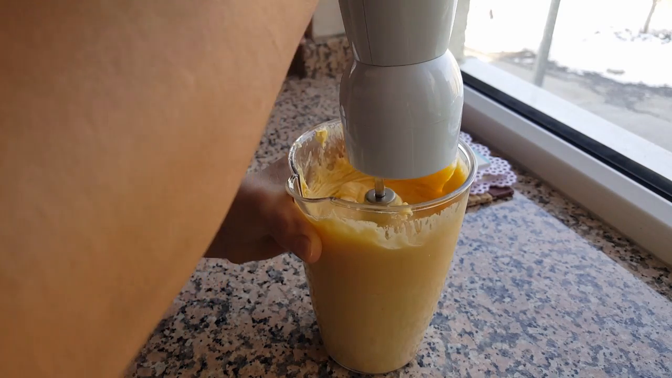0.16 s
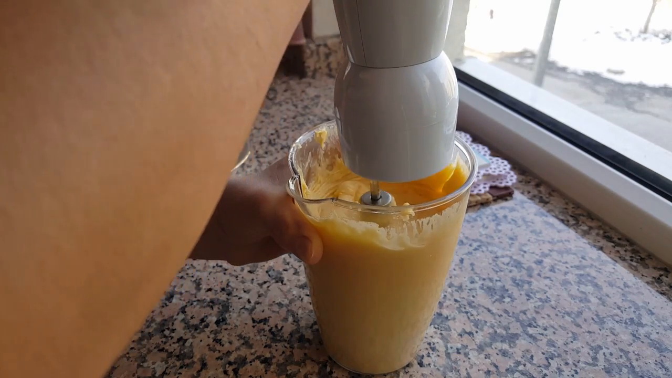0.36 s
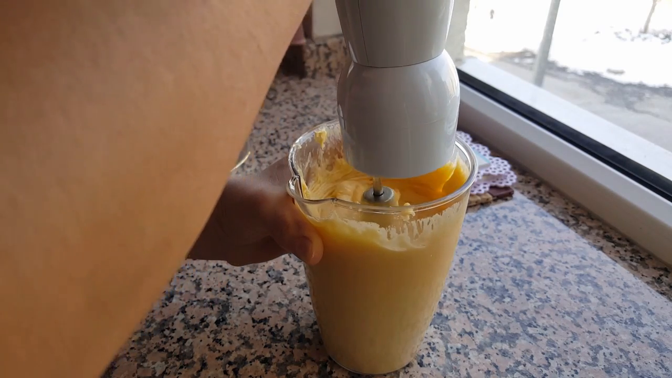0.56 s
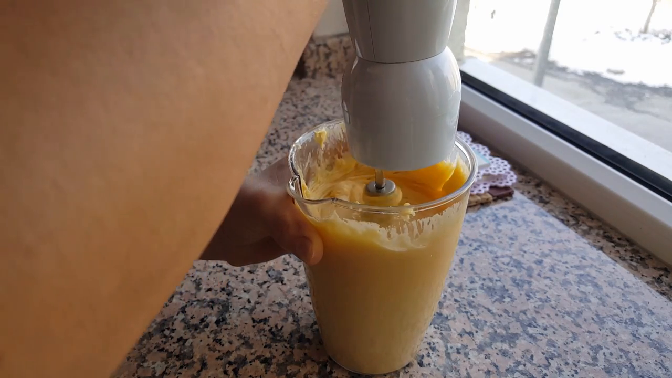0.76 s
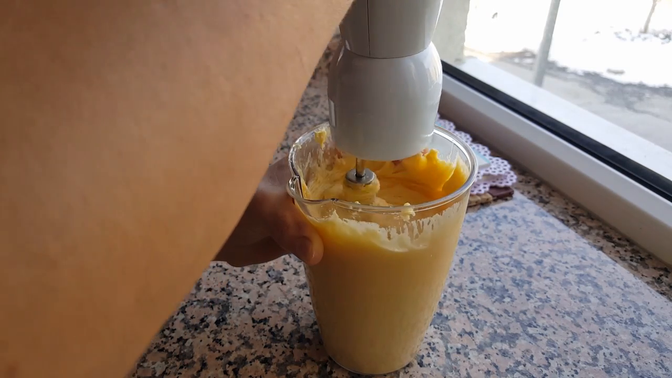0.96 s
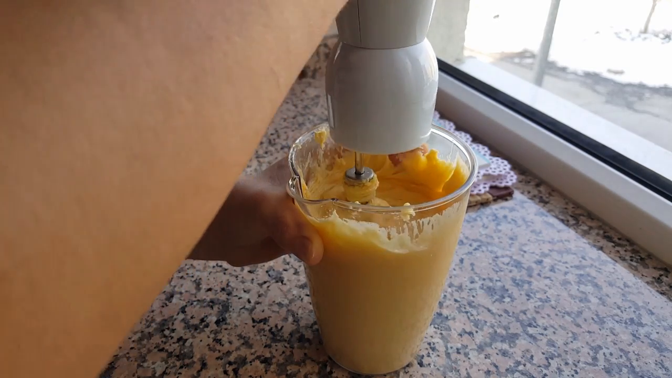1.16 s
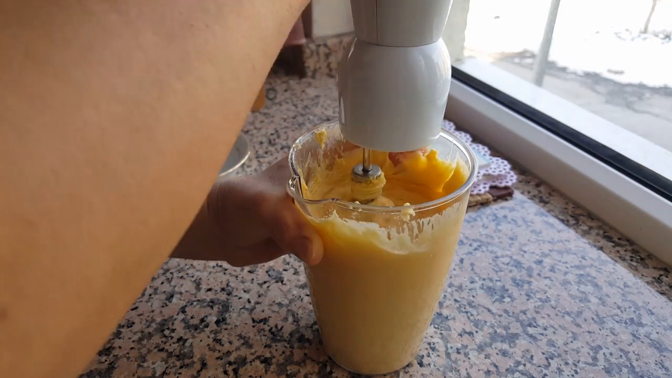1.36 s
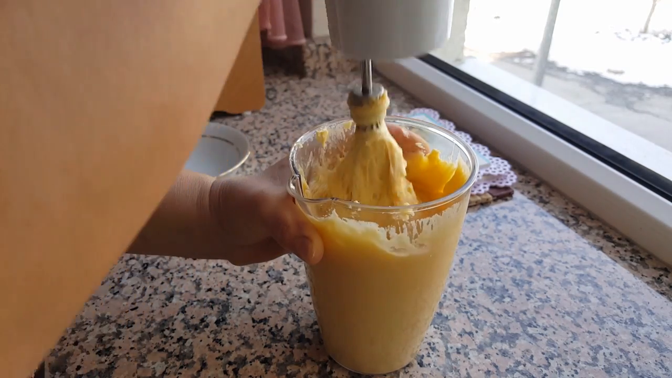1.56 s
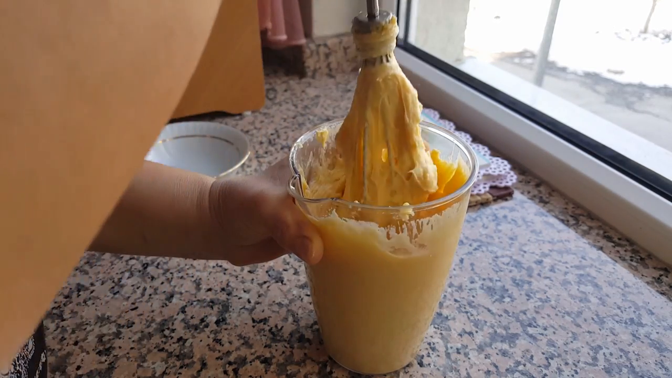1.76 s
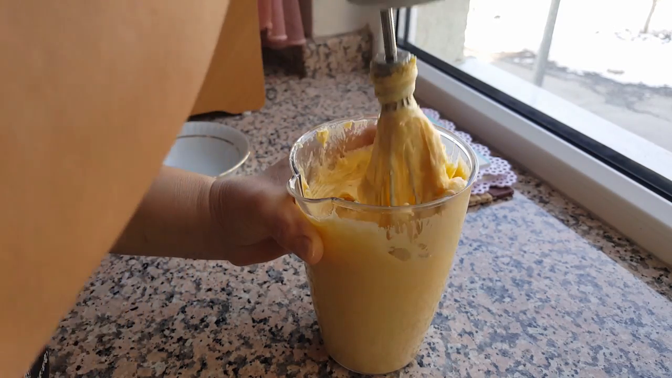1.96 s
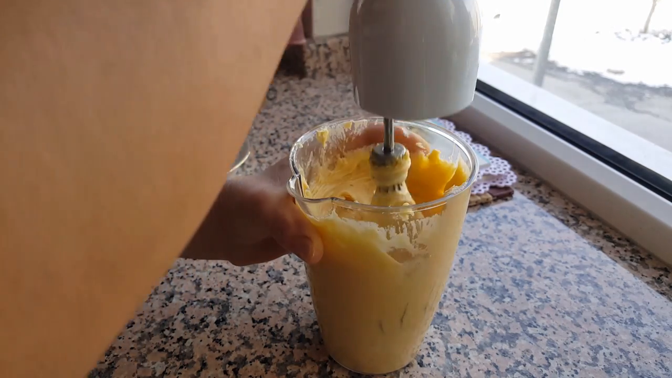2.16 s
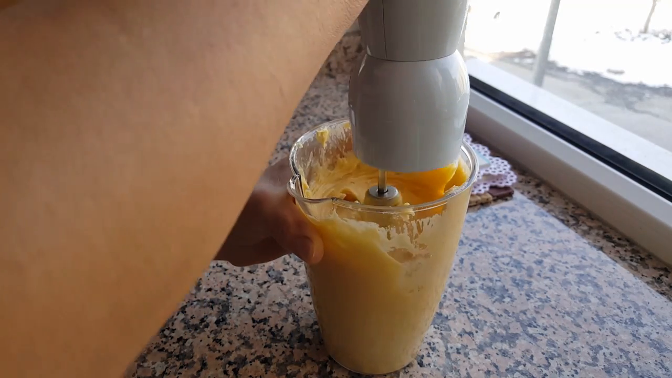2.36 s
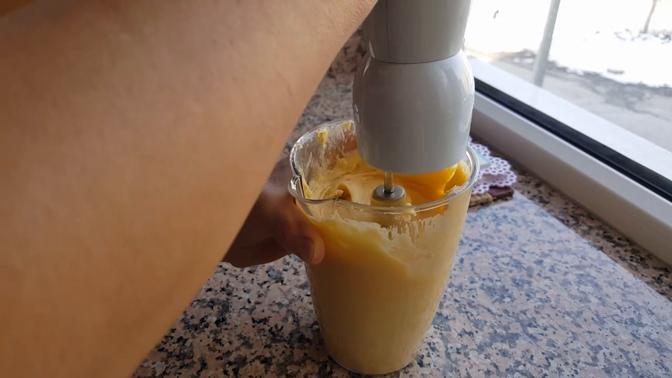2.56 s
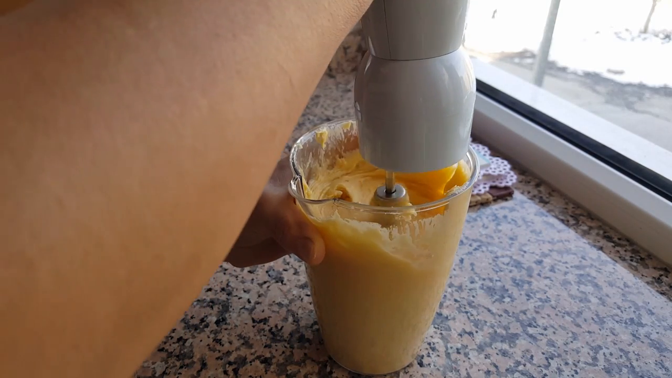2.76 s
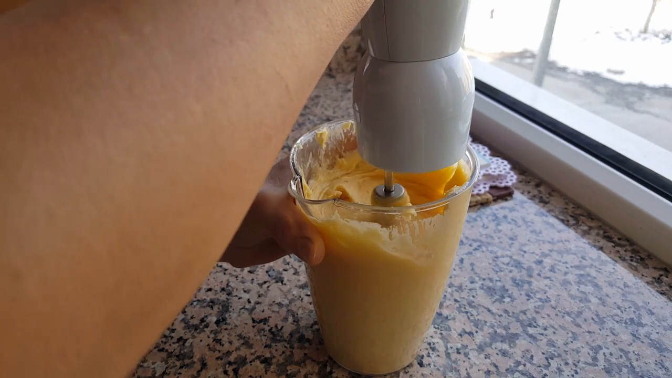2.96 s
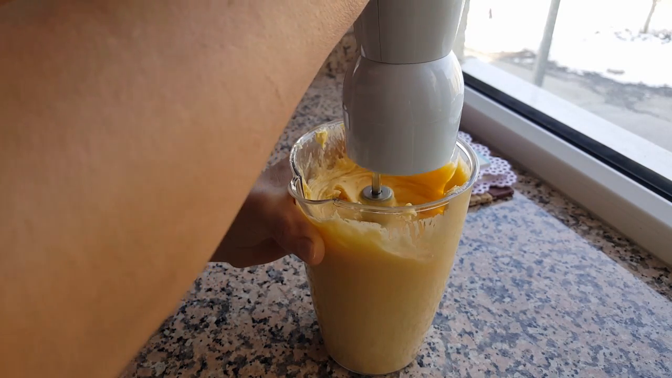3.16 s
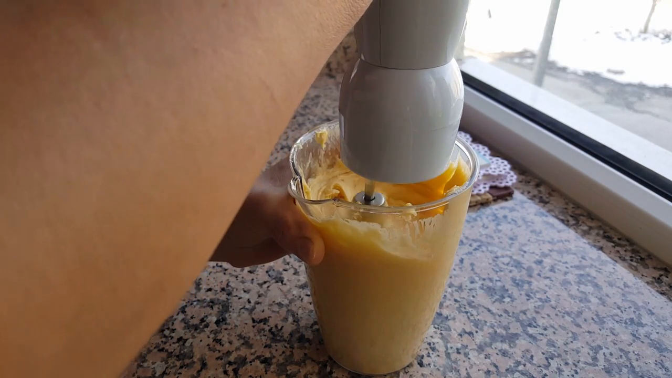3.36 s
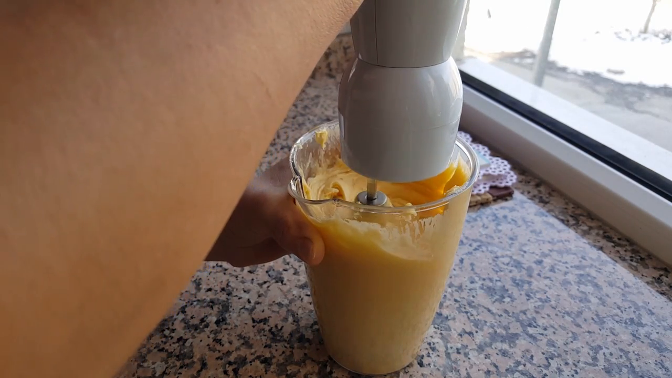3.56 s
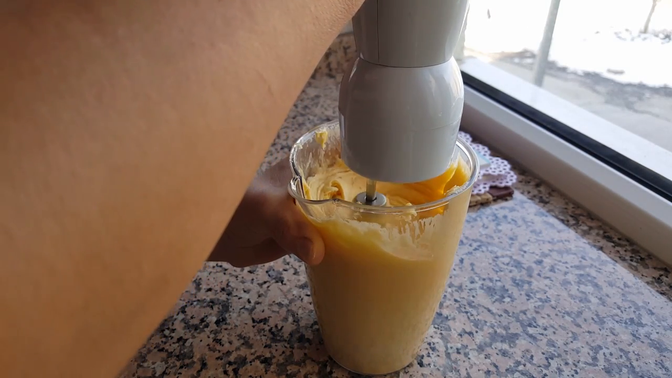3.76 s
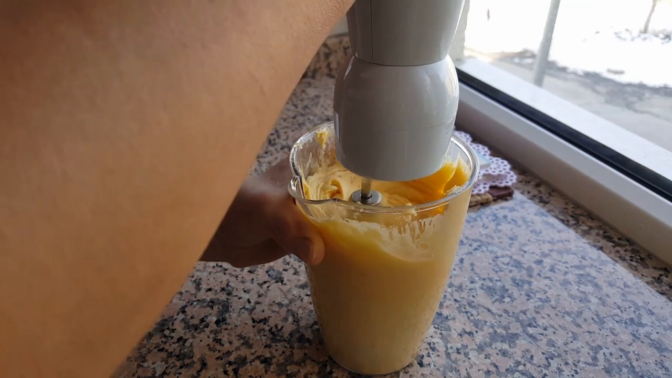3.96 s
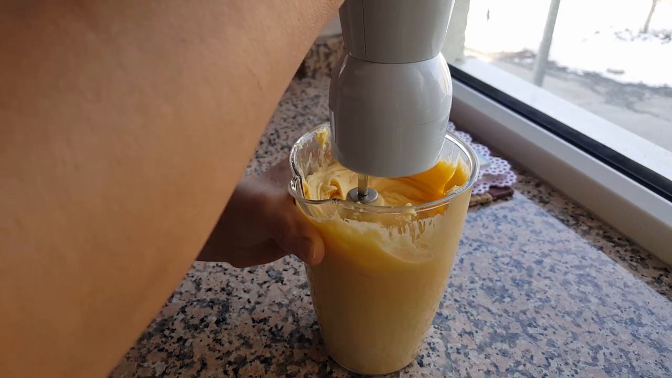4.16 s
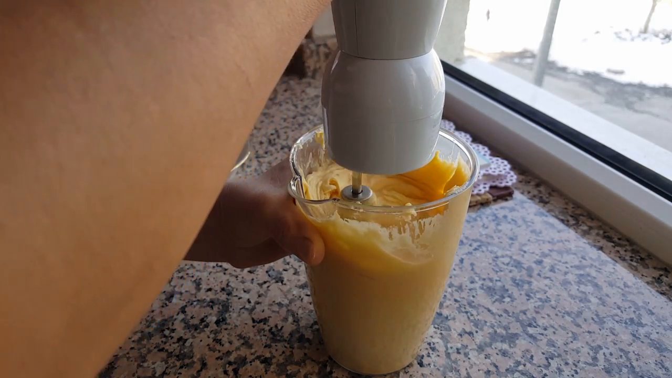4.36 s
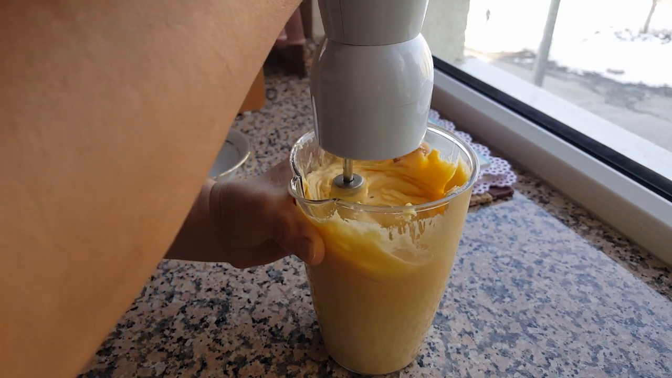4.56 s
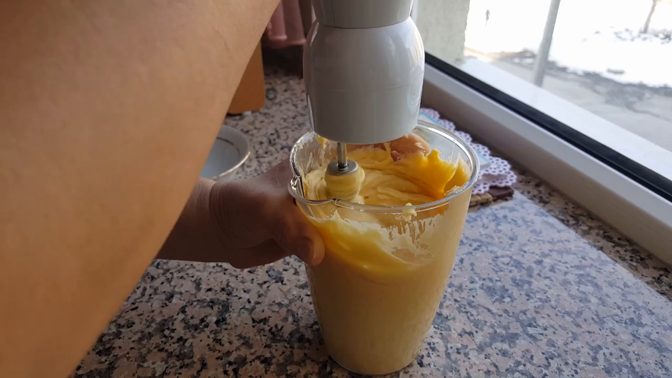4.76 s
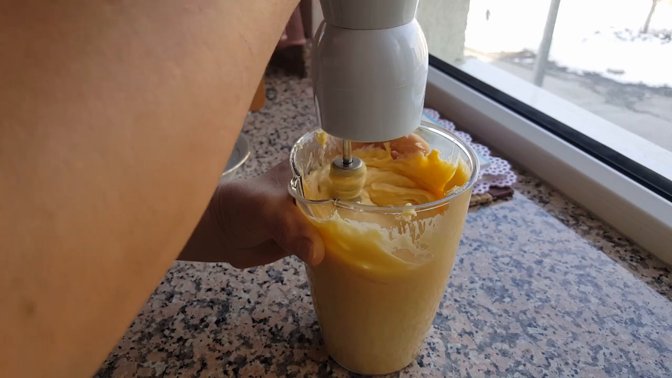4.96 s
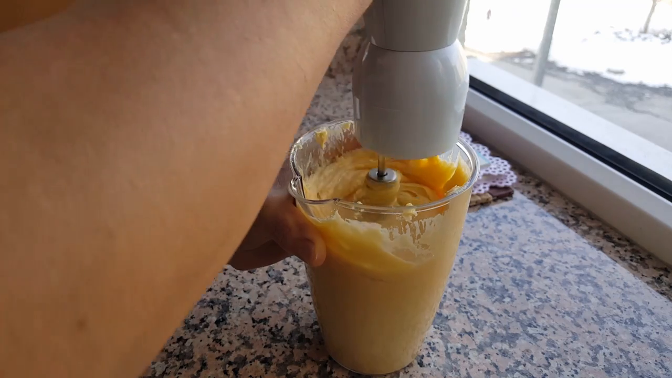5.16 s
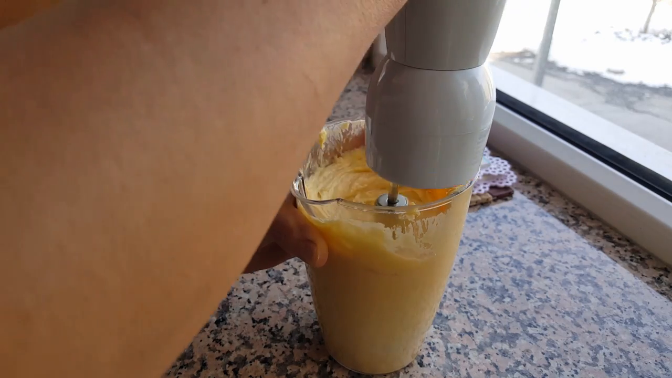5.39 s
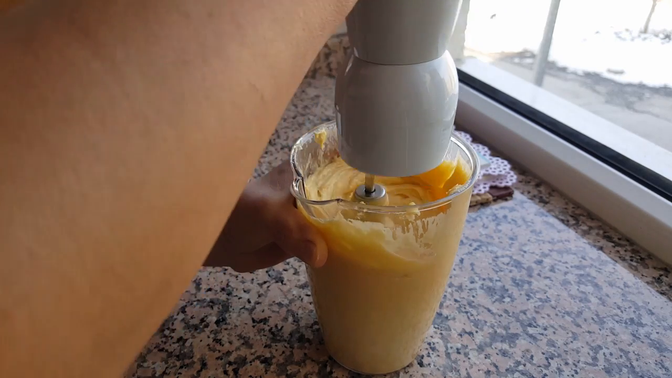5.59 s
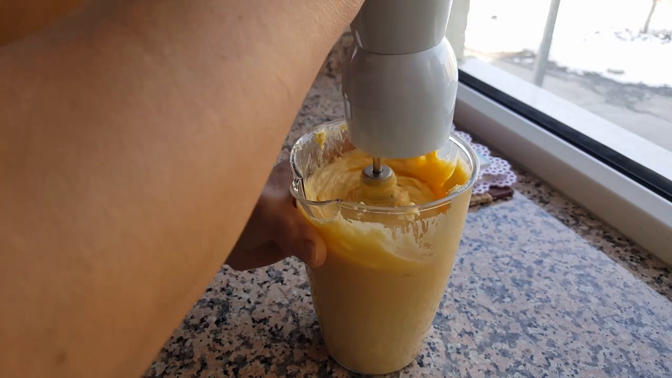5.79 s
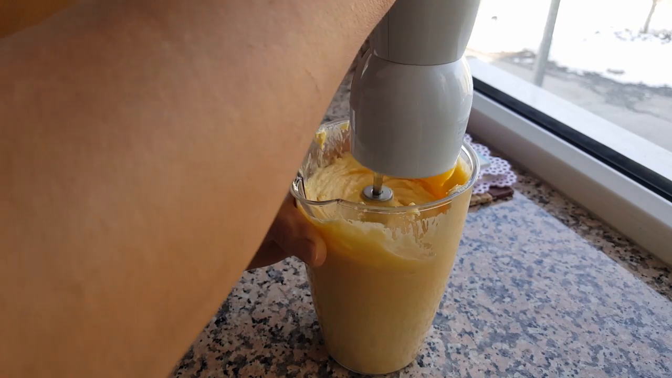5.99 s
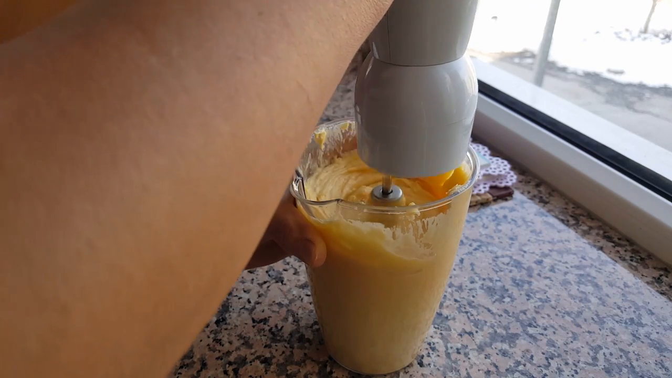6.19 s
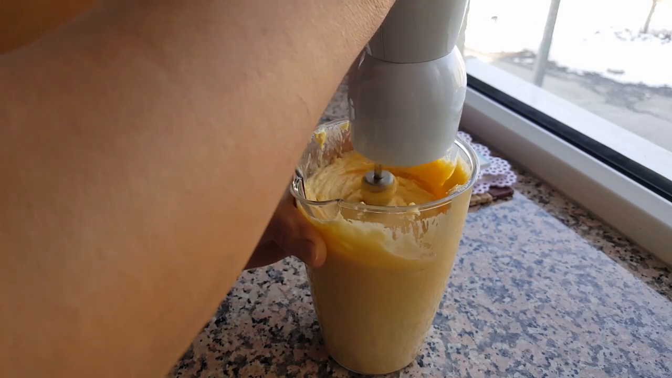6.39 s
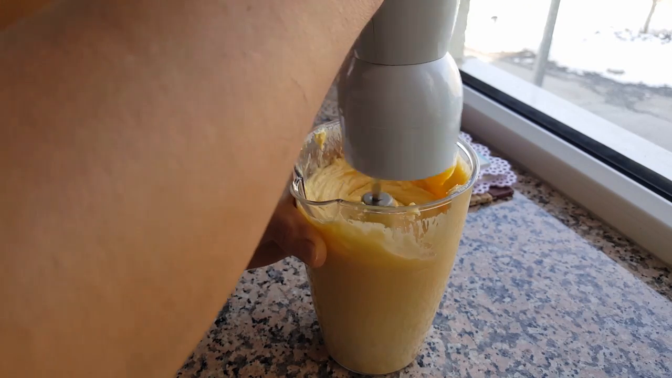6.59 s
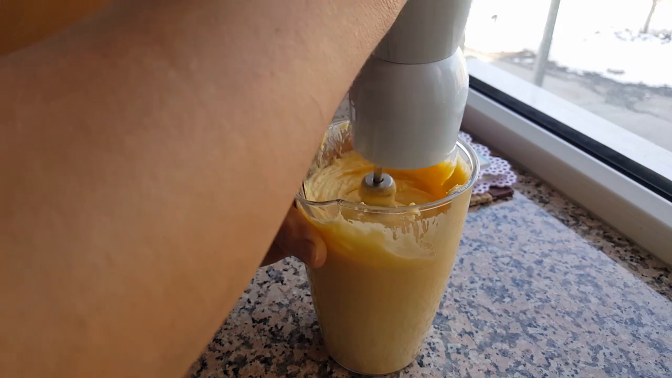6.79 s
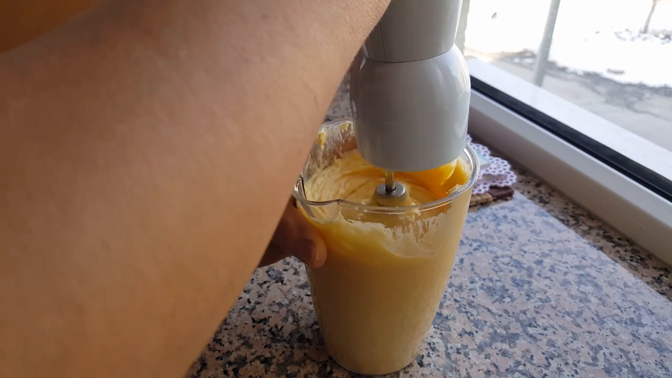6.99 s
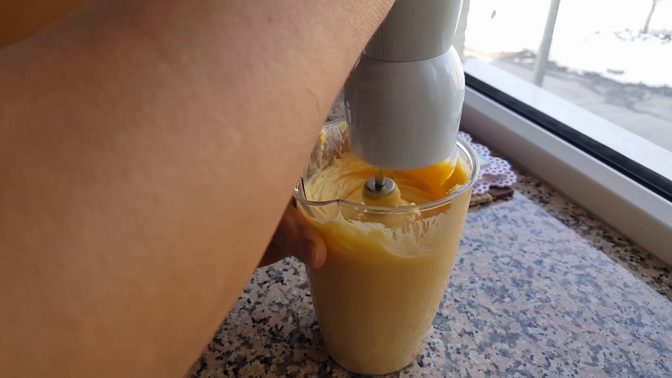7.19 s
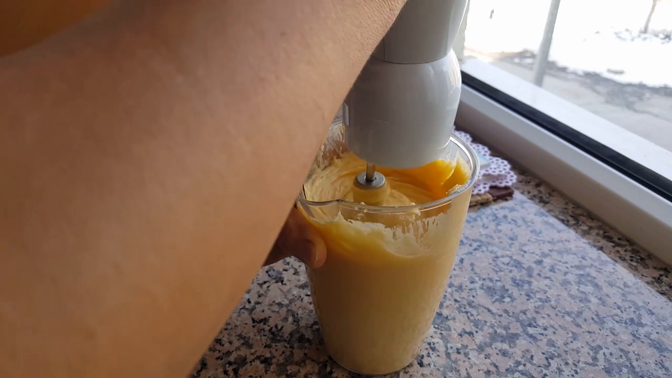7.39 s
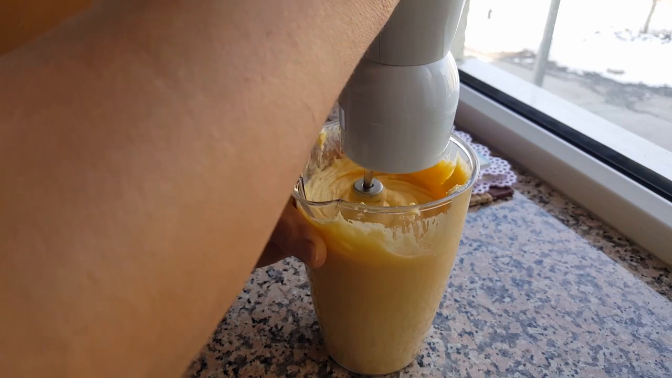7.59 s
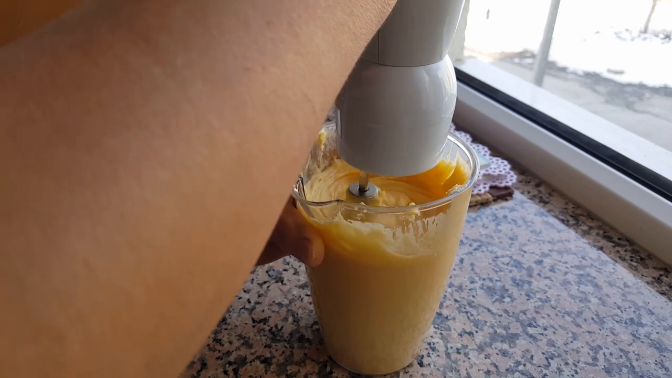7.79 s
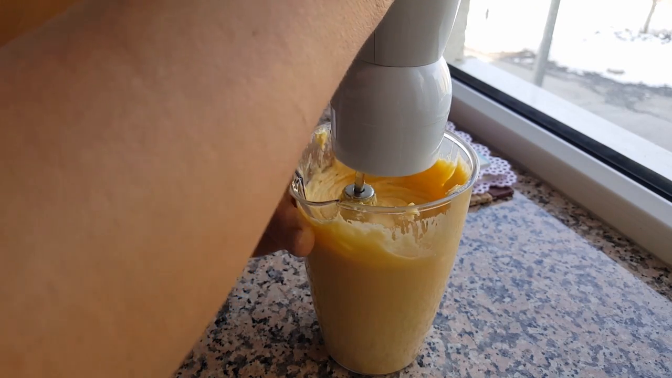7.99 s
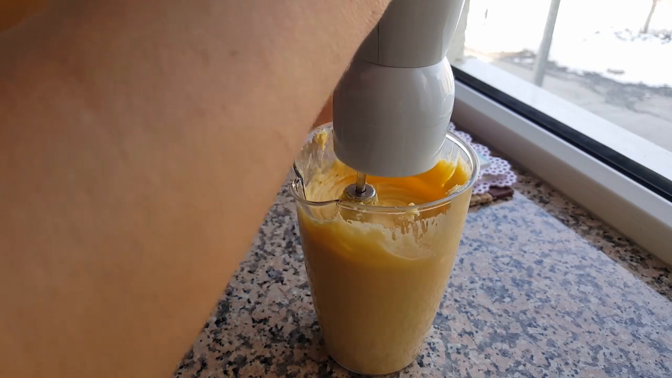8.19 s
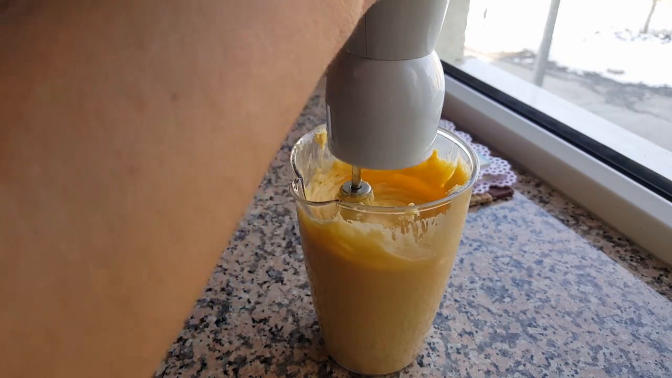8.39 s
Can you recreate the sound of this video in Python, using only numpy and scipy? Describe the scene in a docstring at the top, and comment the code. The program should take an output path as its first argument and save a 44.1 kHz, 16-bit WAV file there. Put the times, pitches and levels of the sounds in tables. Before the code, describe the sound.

A hand mixer's last spin dies away, then a short burst of buzzing high whine and rushing noise beats thick dough, the whisk rattling on a plastic jug. It coasts down; in the pause the dough squelches wetly and pops. A click starts a longer, wavering burst which finally runs down to room hum. Close stereo pickup in a small, lively kitchen.

```python
"""Hand mixer in thick dough

A mixer runs down, then beats dough in a plastic jug on a stone counter in two bursts, in a humming kitchen.
Its mains motor whines at multiples of the rotor speed, the brushes hiss, and the geared-down whisk scrapes
and knocks. In the pause the whisk leaves the dough with a squelch. Tones are sines locked to the rotor angle,
rush and scrape are shaped noise, knocks, clicks and pops are ringing modes; feedback delays give the room."""
import sys
import numpy as np
from scipy import signal
from scipy.io import wavfile

SR = 44100
rng = np.random.default_rng(int(sys.argv[2]) if len(sys.argv) > 2 else 0)


def inscribe(sig):
    """Save sig as 16-bit PCM at rate SR to the path in sys.argv[1].

    A 1-D sig is mono; a 2-D sig holds one channel per row.
    Samples are clipped to [-1, 1] before scaling.
    """
    pcm = np.round(np.clip(np.atleast_2d(sig).T, -1, 1) * 32767)
    wavfile.write(sys.argv[1], SR, pcm.astype(np.int16))


N = 372204
TIME = np.arange(N) / SR
SLOTS, MAINS_HZ, GEAR_RATIO = 14, 50, 22 / 3   # rotor slots; rotor turns per whisk turn
# The mixer is moved about. Each row: time in seconds, left minus right in dB of slot whine, of brush whistle.
SWAY = [(2.6, 5.5, 6.5), (4.0, 6, -4), (7.9, 2, 5)]
# Gears and fan. Each row: time in seconds, level in dB before trim.
GEARS = [(0.97, -34), (2.65, -37), (3.78, -33.5), (4.7, -34.5), (4.79, -41), (5.32, -36.5), (7.84, -38)]


def from_db(db):
    """Decibels to gain."""
    return 10 ** (np.asarray(db) / 20)


def rms_one(x):
    """Scale so that the middle of the stereo image has rms 1."""
    return x / np.sqrt(np.mean(np.atleast_2d(x).mean(axis=0) ** 2) + 1e-20)


def in_time(table):
    """Join the rows of a table with straight lines; one curve per column after the time."""
    s, *columns = np.transpose(table)
    return [np.interp(TIME, s, c) for c in columns]


def at_hz(points, hz):
    """Read a spectrum on a log-frequency axis."""
    points_hz, values = np.transpose(points)
    return np.interp(np.log(hz), np.log(points_hz), values)


def drift(rate_hz):
    """Random wander with spread 1: noise at SR / 40 through two equal low-pass poles."""
    r = np.exp(-80 * np.pi * rate_hz / SR)
    noise = rng.standard_normal(N // 40 + 2002)
    slow = signal.lfilter([1], [1, -2 * r, r * r], noise)[2000:]
    return np.interp(np.arange(N) / 40, np.arange(len(slow)), rms_one(slow))


def pan(left_db):
    """Left and right gains with mean 1; left_db is left minus right."""
    gains = from_db(np.array([[.5], [-.5]]) * left_db)
    return gains / gains.mean(axis=0)


def band_pass(low_hz, high_hz, x):
    """Second-order Butterworth band."""
    return signal.sosfilt(signal.butter(2, [low_hz, high_hz], "band", fs=SR, output="sos"), x)


def coloured(spectrum, sources):
    """Third-octave stereo bands, fed in turn from two (mid, side) pairs; rms 1."""
    # Likeness of left and right. Each row: frequency in Hz, correlation.
    likeness = [(60, 1), (250, 0.43), (2500, 0.17), (6000, 0)]
    out, edges_hz = 0, 28 * 2 ** (np.arange(29) / 3)
    for k, (low, high) in enumerate(zip(edges_hz, edges_hz[1:])):
        mid, side = band_pass(low, high, sources[k % 2] + 1e-18)
        hz = np.sqrt(low * high)
        alike = np.clip(at_hz(likeness, hz), -1, 1)
        stereo = np.sqrt(1 + alike) * mid + np.sqrt(1 - alike) * side * [[1], [-1]]
        out = out + from_db(at_hz(spectrum, hz)) * stereo
    return rms_one(out)


def white():
    """Two (mid, side) pairs of unrelated noise."""
    return rng.standard_normal((2, 2, N))


def grains(per_s, spread_db):
    """Random clicks of uneven size and sign."""
    struck = rng.random(N) < per_s / SR
    size = from_db(spread_db * np.minimum(rng.exponential(1, N), 3))
    return struck * size * rng.choice([-1, 1], N)


def blows(events):
    """One click for each (s, dB) event."""
    out = np.zeros(N)
    for s, db in events:
        out[round(s * SR)] = from_db(db)
    return out


def strike(clicks, modes, vary):
    """Each click rings every (Hz, dB, t60 s) mode with a strength of its own on each side."""
    out = 0
    at = np.flatnonzero(clicks)
    for k, (hz, db, t60_s) in enumerate(modes):
        r, w = from_db(-60 / (t60_s * SR)), 2 * np.pi * hz / SR
        hits = np.zeros((2, N)) + 1e-18
        hits[:, at] = clicks[at] * (1 + vary * rng.standard_normal((len(at), 2)).T)
        ring = signal.lfilter([0, np.sin(w)], [1, -2 * r * np.cos(w), r * r], hits)
        out = out + (-1) ** k * from_db(db) * ring
    return out


def tone(phase, db, left_db, lead, rough):
    """A stereo partial whose strength flutters; lead is the phase between the ears in radians."""
    flutter = 1 + rough * np.array([drift(56), drift(36)])
    wave = np.sin(phase + np.array([[.5], [-.5]]) * lead)
    return np.sqrt(2) * from_db(db) * pan(left_db) * flutter * wave


def swells(events):
    """Bell-shaped swell for each (middle s, dB, half length s) event."""
    return sum(from_db(db) * np.exp(-((TIME - s) / length) ** 2) for s, db, length in events)


def background():
    """Wavering hum at twice and four times mains frequency over shaped kitchen noise."""
    # Each row: frequency in Hz, relative density in dB per Hz.
    ambience = [(30, -20), (100, 2.5), (200, -11.5), (500, -9.5), (1400, -24.5), (8000, -37.5),
                (14000, -39.5)]
    mains = 2 * np.pi * MAINS_HZ * TIME
    hum = tone(2 * mains, -52 + 1.4 * drift(2), 1.5, lead=0, rough=.1)
    hum += tone(4 * mains, -63, 0, lead=0, rough=0.18)
    return hum + from_db(-55.5) * coloured(ambience, white()) * pan(1.5)


def rotor_speed():
    """Share of full speed: a jolt and a climb at switch-on; then drag and friction stop the rotor."""
    # Each row: switch on in seconds, off in seconds, spin-up time constant, drag time constant in seconds.
    bursts = [(-1, -.09, .04, .122), (.168, .998, .041, .122), (2.491, 7.878, .06, .138)]
    kick, friction = .37, .27   # jolt, as the tanh argument at switch-on; dry friction as a share of full drag
    share = np.zeros(N)
    for on, off, spin_up_s, drag_s in bursts:
        climb = np.tanh(kick + np.maximum(TIME - on, 0) / spin_up_s)
        coast = (1 + friction) * np.exp(-np.maximum(TIME - off, 0) / drag_s) - friction
        share += (TIME >= on) * climb * np.maximum(coast, 0)
    return np.clip(share, 0, 1)


def rotor_angle(slot_hz):
    """Rotor angle, nudged by each mains half-wave, by the dough on each whisk turn, and by gear play."""
    angle = 2 * np.pi * np.cumsum(slot_hz / SLOTS) / SR
    mains_ripple = -0.0072 * np.sin(4 * np.pi * MAINS_HZ * TIME)
    whisk_drag = 0.008 * np.sin(angle / GEAR_RATIO)
    return angle + mains_ripple + whisk_drag + 0.0099 * drift(30)


def housing_drone(angle, speed):
    """The housing drones at rotor orders 2 to 5."""
    # Each row: time in seconds, third order in dB, fourth order in dB, both before trim.
    drone = [(0.28, -38, -41), (0.866, -46, -40), (2.69, -42, -40.5), (3.64, -46.5, -35),
             (4.63, -36, -34.5), (5.19, -34.5, -35.5), (5.38, -35, -46), (5.59, -40.5, -42.5),
             (5.67, -32.5, -36), (5.92, -36, -35.5), (6.05, -44, -40), (6.18, -34, -38.5),
             (7.76, -39.5, -42), (7.86, -43, -39.5)]
    third_db, fourth_db = in_time(drone)
    out = tone(3 * angle, third_db + 1.1, -3.0, lead=.17, rough=0.19)
    out += tone(4 * angle, fourth_db + .5, 5.9, lead=-.07, rough=0.3)
    out += tone(2 * angle, .5 * third_db - 35, 0, lead=0, rough=.2)
    out += tone(5 * angle, .5 * third_db - 28, 2, lead=0, rough=.2)
    return out * speed ** 3.4


def slot_whine(angle, speed, current, extra_percent):
    """Slots passing under power whine; mains current bends the phase and the whisk makes it beat."""
    # Each row: time in seconds, level in dB before trim.
    whine = [(0.28, -24), (0.6, -28.5), (0.98, -26.5), (2.63, -27), (3.15, -32.5), (3.33, -22),
             (3.99, -25.5), (4.55, -20.5), (5.27, -24.0), (5.41, -20), (5.61, -32.5), (5.71, -24),
             (6.05, -22.5), (6.21, -28.0), (6.31, -25), (6.49, -27.5), (6.69, -22.0), (6.79, -28.5),
             (7.01, -24), (7.19, -26.5), (7.45, -25), (7.85, -24)]
    # The octave comes and goes as the mixer is tilted. Each row: time in seconds, level in dB.
    octave = [(0.6, -45), (2.65, -38.5), (4.35, -37), (4.95, -42), (5.34, -35.5), (5.46, -34),
              (5.56, -34.5), (5.9, -47), (6.01, -35), (6.15, -41), (7.25, -42), (7.44, -33), (7.6, -42)]
    # Beat once per whisk turn. Each row: time in seconds, depth 0 to 1.
    whine_beat = [(.3, .55), (.7, 0.63), (3.05, 0.5), (3.35, 0.31), (4.15, 0.38), (4.5, 0.03), (5.9, 0.13),
                  (6.3, 0.33), (7.8, 0.1)]
    [slot_db], [octave_db], [depth] = in_time(whine), in_time(octave), in_time(whine_beat)
    slot_pan_db = in_time(SWAY)[0]
    turn = angle / GEAR_RATIO
    beat = (1 + depth * np.exp(-1j * (turn + .5 * drift(6.7)))) / np.sqrt(1 + depth ** 2)
    phase = SLOTS * angle + 0.43 * current * np.clip(1 - 0.39 * extra_percent, 0, 1)
    unsteady = (1.3 - speed ** 2) * drift(92)
    rough = 0.15 + 1.4 * speed * (1 - speed ** 2)   # rattles while spinning up or down
    out = tone(phase + np.angle(beat) + unsteady, slot_db + .7, slot_pan_db, lead=0.27, rough=rough)
    out *= (1 + 0.16 * current) * np.abs(beat)
    return out + tone(2 * phase, octave_db, 0, lead=1, rough=0.23) * speed ** 10


def minor_orders(angle, speed, extra_percent):
    """Weaker rotor orders wander in level, some rising or falling with extra speed, and throb twice per whisk turn."""
    # Each row: multiple of rotor speed, mean level in dB, dB gained per percent of extra speed.
    orders = [(8, -52.5, 0), (12.45, -45, 4.5), (13, -40, 1.9), (15, -45.5, -6), (17.85, -44, 0),
              (20, -50, -5)]
    out = 0
    for multiple, db, rise_db in orders:
        phase = multiple * (angle + 0.023 * drift(40))
        level_db = db + rise_db * extra_percent + 2.0 * drift(1.0)
        out = out + tone(phase, level_db, 0.9, lead=rng.normal(0, 1.0), rough=0.24)
    throb = 1 + 0.12 * np.sin(2 * angle / GEAR_RATIO)
    return out * throb * speed ** 2


def brush_whistle(angle, speed, current):
    """Brushes whistle at 3 and 5 times slot rate; mains chatter splits the whistle into lines 100 Hz apart."""
    # Each row: time in seconds, level in dB before trim.
    whistle = [(0.28, -31), (0.98, -30), (2.63, -31), (3.09, -32.5), (3.37, -28.0), (3.57, -33),
               (4.19, -31.0), (4.43, -26.5), (4.61, -31), (5.01, -24.0), (5.43, -31.5), (5.97, -24),
               (6.05, -30), (7.33, -32), (7.85, -30)]
    [whistle_db], whistle_pan_db = in_time(whistle), in_time(SWAY)[1]
    phase = 3 * SLOTS * angle + 0.64 * drift(70) + 1.46 * current
    out = tone(phase, whistle_db + 1.8, whistle_pan_db, lead=1.35, rough=0.26)
    out += tone(5 * SLOTS * angle + 1.8 * drift(150), whistle_db - 19.5, 0, lead=1.7, rough=0.37)
    return out * (1 + current / 7) * speed ** 5


def motor_tones(angle, speed, current, extra_percent):
    """Rotor orders; the small housing radiates the whine poorly at a low pitch."""
    radiated = np.tanh(2.6 * speed ** 2) ** 1.2
    whine = slot_whine(angle, speed, current, extra_percent) + minor_orders(angle, speed, extra_percent)
    return whine * radiated + brush_whistle(angle, speed, current) + housing_drone(angle, speed)


def bearing(angle, speed):
    """A bearing sings just under the sixth order, with its octave; it stutters when it barely catches."""
    # Each row: time in seconds, level in dB before stutter and trim.
    singing = [(0.28, -26.5), (0.4, -28), (0.8, -22.5), (0.98, -27), (2.63, -29), (3.05, -32),
               (3.31, -21.5), (4.01, -29), (4.35, -27.0), (4.65, -32.5), (4.79, -42.5), (5.13, -42.5),
               (5.37, -23), (5.57, -40.5), (5.73, -27.5), (5.81, -37.0), (6.23, -28), (6.66, -39),
               (6.87, -28), (7.01, -34), (7.3, -34.5), (7.85, -32)]
    [level_db] = in_time(singing)
    stutter = np.clip((-23.5 - level_db) / 11, .2, 1)
    phase = 5.945 * angle
    catch = from_db(stutter * (1.5 * drift(25) + 5.5 * np.cos(angle / GEAR_RATIO) - 2.2))
    song = tone(phase + 0.51 * stutter * drift(25), level_db + .1, 12.0, lead=-0.25, rough=0.29)
    octave = tone(2 * phase + 0.91 * drift(40), .5 * level_db - 19.5, 2.3, lead=0.8, rough=0.49)
    return (song + octave) * catch * speed ** 8


def gear_teeth(angle, speed):
    """The gear teeth ring at multiples of rotor speed, coming and going, strongest near 7.45 s."""
    # Each row: time in seconds, base level in dB.
    teeth = [(4.9, -58), (5.4, -46), (6.2, -47.5), (7.3, -46), (7.45, -40), (7.68, -49), (7.85, -43)]
    # Each row: multiple of rotor speed, dB over the base level.
    teeth_orders = [(17.4, -4), (24, 2.5), (24.58, -3), (28.58, 0.5), (31, -2)]
    [teeth_db] = in_time(teeth)
    play = angle + 0.023 * drift(23)
    ring = sum(tone(multiple * play, teeth_db + db, 0, lead=0.97, rough=0.28) for multiple, db in teeth_orders)
    return ring * speed ** 2


def motor_noise(angle, speed, current, rubbing_db):
    """Fan and gears rush, brushes hiss; each turn repeats the same roughness of commutator and teeth."""
    # Each row: frequency in Hz, relative density in dB per Hz.
    rush_spectrum = [(30, -5.5), (150, -8.5), (280, -1), (600, -1.5), (1100, 8.5), (1700, 5), (2200, 8),
                     (2700, 6), (3700, 0), (5000, -2), (6400, -0.5), (8000, -2.5), (10000, -31),
                     (15000, -36)]
    [gear_db] = in_time(GEARS)
    surface = rng.standard_normal((2, 2, 256))   # roughness around one rotor turn
    place = (angle / (2 * np.pi) % 1 * surface.shape[-1]).astype(int)
    rush = coloured(rush_spectrum, white() + .33 * surface[..., place])
    low = signal.sosfilt(signal.butter(1, 2600, fs=SR, output="sos"), rush)
    # starting current makes gears and brushes loud before the rotor is up to speed
    drive = speed + 0.47 * (1 - speed) * (np.gradient(speed) > 0)
    gear_grain = 1 + 0.09 * np.sin(2 * angle / GEAR_RATIO) + .15 * np.sin(angle) + .28 * drift(120)
    gears = low * from_db(gear_db + 5.5) * drive ** 0.67 * gear_grain
    brush_grain = 1 + 0.22 * current + 0.22 * np.sin(angle) + .2 * drift(90)
    brushes = (rush - low) * from_db(-29 + 0.13 * rubbing_db) * drive ** 1.58 * brush_grain
    return (gears + brushes) * pan(0.65)


def whisk(angle, speed, rubbing_db):
    """The whisk shakes jug and dough at multiples of its turn rate, and rubs or knocks on the wall once a turn."""
    # Each row: multiple of whisk speed, relative level in dB.
    shake = [(2, 1), (3, -0.5), (4, 5), (5, -0.5), (6, 3), (7, 3.5), (9, -2)]
    # Runs of knocks. Each row: first knock in seconds, strike in dB before trim, length of the run in seconds.
    knock_runs = [(.345, -10.5, .07), (0.4347, -7, .02), (.4761, -11.5, .02), (0.4863, -9, .02),
                  (.5189, -12.5, .11), (.734, -11.5, .07), (2.612, -22.5, .15), (2.804, -12, .11),
                  (3.085, -15, .11), (5.535, -10.5, .02), (5.5798, -14, .07), (5.596, -7, .02),
                  (5.6536, -11.5, .02), (6.3046, -7, .07), (6.8144, -7.5, .07)]
    # Jug modes. Each row: frequency in Hz, relative level in dB, t60 in seconds.
    jug_modes = [(1350, -22, 0.0095), (2437, -7.5, 0.016), (4010, -14, 0.015), (4750, -4, 0.0029),
                 (5130, -5.5, 0.0052), (7030, -2, .006), (7860, -8, 0.009), (12020, -13, 0.0042)]
    turn_s = .043
    turn = angle / GEAR_RATIO
    [gear_db] = in_time(GEARS)
    churn_db = -45.3 + 0.28 * rubbing_db + gear_db - gear_db.mean()
    churn = sum(from_db(db) * np.sin(k * (turn + 0.19 * drift(4))) for k, db in shake)
    contacts = grains(1500 * np.exp(1.2 * (np.cos(turn) - 1)), spread_db=4.0)
    rub = from_db(-36 + 1.08 * rubbing_db) * rms_one(strike(contacts, jug_modes, vary=1.0))
    hits = [(s + k * turn_s, db) for s, db, length in knock_runs for k in range(1 + int(length / turn_s))]
    knocks = from_db(-2.5) * strike(blows(hits), jug_modes, vary=0.22)
    return (from_db(churn_db) * rms_one(churn) + rub) * speed ** 2 + knocks


def switch_clicks():
    """The switch clicks and rings the handle."""
    # Each row: time in seconds, strike in dB before trim.
    clicks = [(0.168, -37), (2.491, -21)]
    # Each row: frequency in Hz, relative level in dB, t60 in seconds.
    handle_modes = [(860, -2, 0.01), (1350, -1, 0.021), (2400, 1.5, 0.018), (4400, -7, .005),
                    (7500, -5, 0.014)]
    return from_db(-3.0) * strike(blows(clicks), handle_modes, vary=.3)


def counter_bumps():
    """The jug shifts and taps the counter."""
    # Each row: time in seconds, strike in dB.
    bumps = [(1.557, -44), (1.989, -39), (2.118, -47), (2.419, -49), (8.225, -35.5)]
    # Each row: frequency in Hz, relative level in dB, t60 in seconds.
    bump_modes = [(704, -1.5, 0.016), (900, -3, .012), (2230, -5, .006), (4600, -17, 0.0037)]
    return strike(blows(bumps), bump_modes, vary=0.24)


def tear_strength():
    """Dough tears as the whisk lifts and sinks; each tear swells and dies away."""
    # Each row: peak in seconds, level in dB, rise and fall time constants in seconds.
    tears = [(1.618, -45.5, 0.012, 0.06), (2.27, -63.5, 0.089, 0.073)]
    out = 0
    for s, db, rise, fall in tears:
        out = out + from_db(db) * np.exp(-np.maximum((s - TIME) / rise, (TIME - s) / fall))
    return out


def dough():
    """Tiny air pockets burst and ring the jug; then the hollow behind the whisk closes with a smack and pops."""
    # Each row: frequency in Hz, relative density in dB per Hz.
    dough_spectrum = [(300, -22), (1000, 3), (1900, -2), (2450, 0), (3500, -2), (5800, -7.5), (7800, -6),
                      (15000, -34.5)]
    # Larger air pockets. Each row: time in seconds, strike in dB, frequency in Hz.
    air_pops = [(1.648, -40, 480), (1.687, -40, 2400), (1.701, -36, 980)]
    tearing = tear_strength() * coloured(dough_spectrum, white() * (.2 + grains(1500, spread_db=1.0)))
    jug = strike(grains(1500, spread_db=2.0), [(2400, 4, 0.027), (1350, -5.5, 0.018)], vary=0.35)
    hollow_modes = [(750, 0, 0.018), (1060, 1, 0.018), (1400, 3, .015)]
    hollow = strike(grains(680, spread_db=0.0), hollow_modes, vary=0.38)
    ringing = rms_one(jug) * swells([(1.618, -40.5, 0.017)])
    smack = rms_one(hollow) * swells([(1.695, -48.5, 0.027)])
    pops = sum(strike(blows([(s, db)]), [(hz, 0, 0.016)], vary=.1) for s, db, hz in air_pops)
    return tearing + ringing + smack + pops


def lumps():
    """A lump of dough is dragged round and the full jug gives: a low rumble swells and fades."""
    # Each row: middle in seconds, level in dB, half length in seconds.
    drags = [(2.936, -39, 0.14), (4.75, -48, 0.071), (5.021, -39, 0.17), (5.566, -42.5, .06),
             (6.88, -40, 0.077), (7.25, -43, 0.082)]
    # Low and high edge in Hz.
    rumble_hz = (106, 199)
    return swells(drags) * rms_one(band_pass(*rumble_hz, rng.standard_normal(N)))


def squeaks():
    """A wire sticking on the jug wall sings briefly at an unsteady pitch."""
    # Each row: middle in seconds, level in dB, half length in seconds.
    wire_squeaks = [(5.46, -36.5, .06), (6.83, -35, .08)]
    phase = 2 * np.pi * 5410 * TIME + 2 * drift(40)
    return swells(wire_squeaks) * tone(phase, 0, 0, lead=1, rough=0.54)


def kitchen(x, wall_cut_hz):
    """Ten feedback delays a side, duller on every round, then diffused by allpasses."""
    t60_s = 0.55
    out, dull = np.zeros((2, N)), np.exp(-2 * np.pi * wall_cut_hz / SR)
    for k, lag in enumerate((rng.uniform(.009, .042, 20) * SR).astype(int)):
        loop, gain, state = x[k % 2].copy(), from_db(-60 * lag / SR / t60_s), [0.]
        for i in range(lag, N, lag):
            back, state = signal.lfilter([gain * (1 - dull)], [1, -dull], loop[i - lag:i], zi=state)
            loop[i:i + lag] += back[:N - i]
        out[k % 2] += (loop - x[k % 2]) * (-1) ** (k // 2)
    for lag in (47, 113):
        taps = np.r_[.5, np.zeros(lag), 1]
        out = signal.lfilter(taps, taps[::-1], out)
    return out / np.sqrt(10)


def scene():
    """Rotor speed and rubbing drive the mixer; the kitchen answers."""
    # Slot rate at full power; it sags as the dough resists. Each row: time in seconds, rate in Hz.
    slot_rate = [(0.3, 2361), (0.78, 2337), (0.98, 2385), (2.65, 2331), (2.71, 2365), (2.89, 2342),
                 (3.37, 2372), (3.57, 2351), (3.95, 2350), (5.15, 2382), (5.37, 2363), (5.47, 2390),
                 (5.59, 2345), (5.89, 2412), (6.03, 2338), (6.17, 2378), (6.99, 2377), (7.11, 2424),
                 (7.23, 2386), (7.45, 2429), (7.65, 2384), (7.85, 2417)]
    # Wires rubbing on the jug wall; also sets brush noise and churning. Each row: time in seconds, rubbing in dB.
    rubbing = [(0.28, -49), (0.42, -42), (0.8, -51.5), (0.98, -51), (2.63, -46.5), (3.01, -43.5),
               (3.29, -51), (3.53, -46.5), (5.13, -45.5), (5.45, -62), (5.51, -45.5), (5.59, -36.5),
               (5.71, -49), (6.03, -48), (6.19, -63), (6.31, -44.5), (6.43, -50), (6.79, -48), (6.85, -43),
               (7.13, -61), (7.25, -43), (7.39, -56), (7.55, -47.5), (7.85, -54)]
    speed = rotor_speed()
    [powered_hz] = in_time(slot_rate)
    extra_percent = 100 * (powered_hz / np.median(powered_hz) - 1)
    rubbing_db = in_time(rubbing)[0] + 48   # relative to the usual -48 dB
    angle = rotor_angle(powered_hz * speed)
    current = np.cos(4 * np.pi * MAINS_HZ * TIME)   # swing at twice mains frequency
    tones = motor_tones(angle, speed, current, extra_percent)
    tones += bearing(angle, speed) + gear_teeth(angle, speed) + squeaks()
    clatter = motor_noise(angle, speed, current, rubbing_db) + whisk(angle, speed, rubbing_db)
    clatter += switch_clicks() + counter_bumps() + dough()
    room = kitchen(from_db(-9.5) * clatter + from_db(-11) * tones, wall_cut_hz=6700)
    return tones + clatter + room + background() + lumps()


def record(dry):
    """The sharpest peaks are rounded off and the top is cut steeply."""
    cutoff_hz = 15200
    rounded = dry / (1 + (dry / .52) ** 6) ** (1 / 6)
    return signal.sosfilt(signal.ellip(10, .2, 80, cutoff_hz, fs=SR, output="sos"), rounded)


dry = scene()
out = record(dry)
inscribe(out)
```